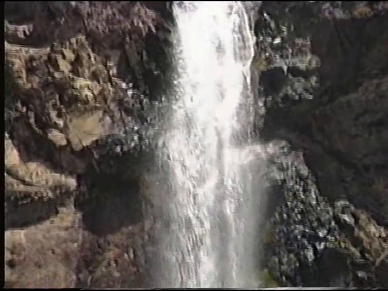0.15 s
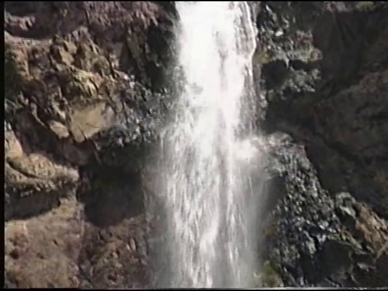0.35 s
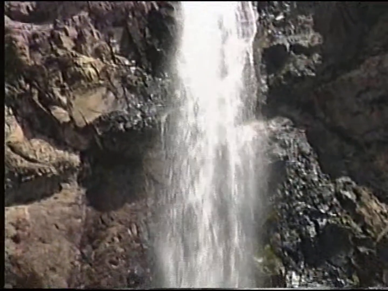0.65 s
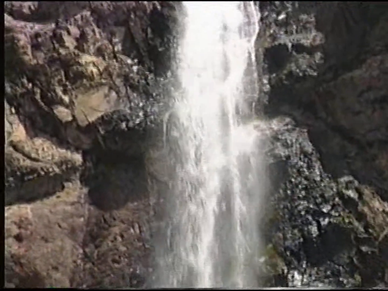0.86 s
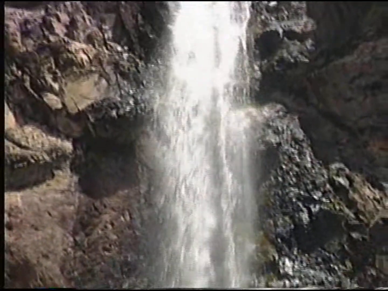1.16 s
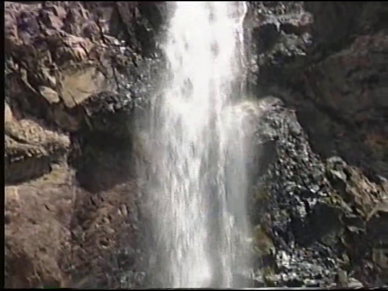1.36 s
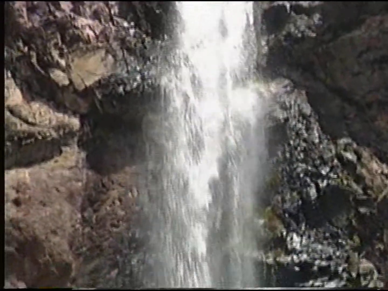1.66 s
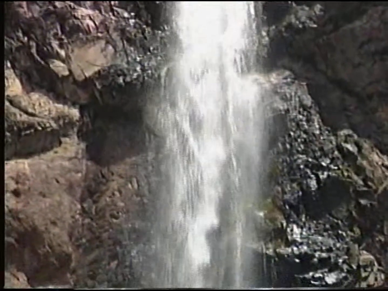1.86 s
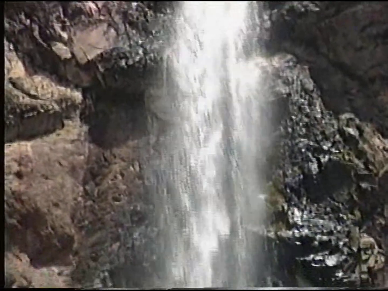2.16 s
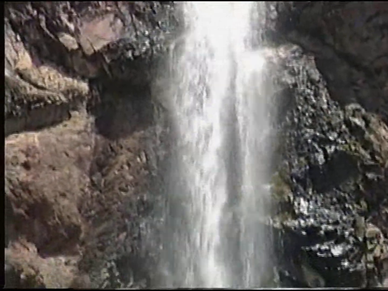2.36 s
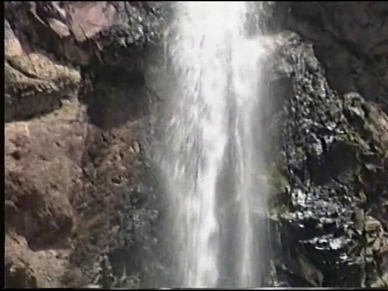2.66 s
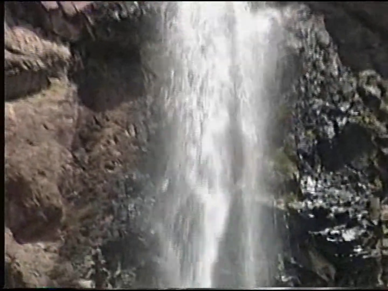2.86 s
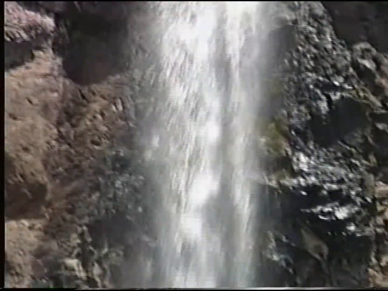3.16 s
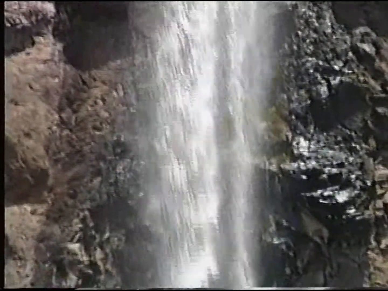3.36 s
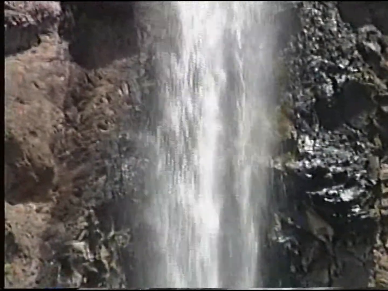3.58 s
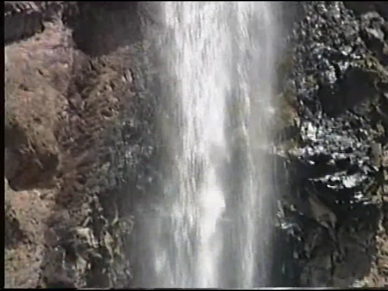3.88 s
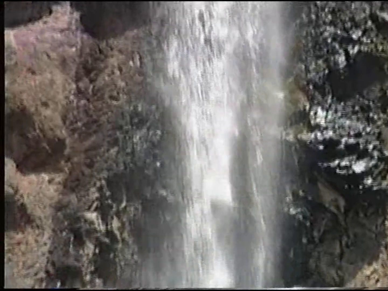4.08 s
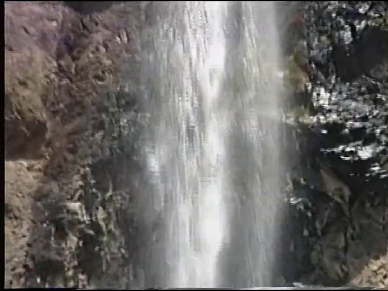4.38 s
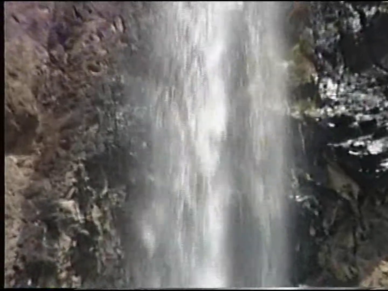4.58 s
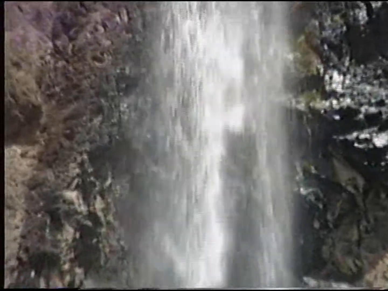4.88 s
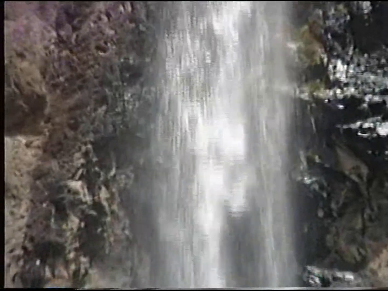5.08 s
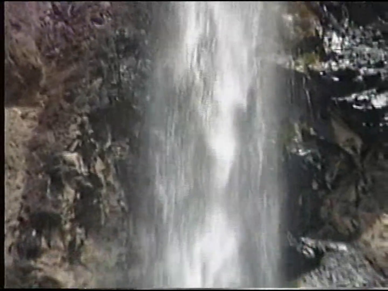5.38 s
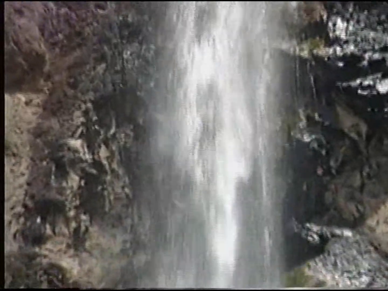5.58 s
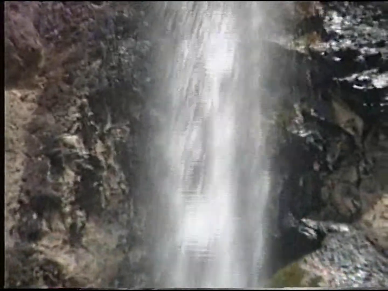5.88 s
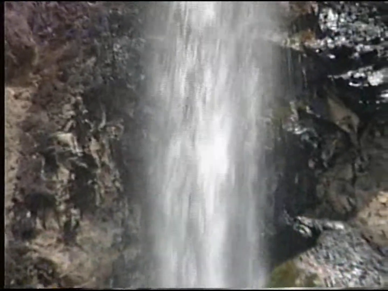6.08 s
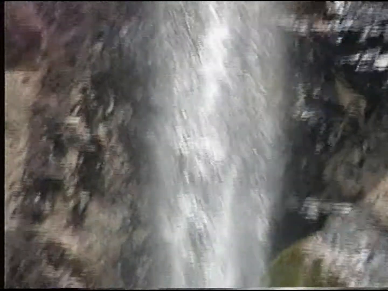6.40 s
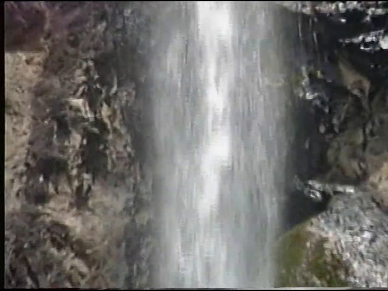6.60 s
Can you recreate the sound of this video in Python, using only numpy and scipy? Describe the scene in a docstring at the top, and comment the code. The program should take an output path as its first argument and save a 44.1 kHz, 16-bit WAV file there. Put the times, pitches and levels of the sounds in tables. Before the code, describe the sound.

A tall waterfall pours down a rock face outdoors, filling everything with an even, continuous roar and a bright hiss of bursting spray. No single splash stands out and the level barely changes from start to finish. An old tape camcorder hears it in mono, thin in the bass, hollow in the midrange, its treble roughened by a fine flutter, with a very faint hum and high whine.

```python
"""Tall waterfall on a tape camcorder

A tall waterfall roars against a rock face: plunging jets and bursting drops, so many that they merge
into a steady roar and a hiss of spray. Each is random noise, coloured and made faintly patchy.
The bass is thin, there is a hollow near 1.6 kHz, and the treble flutters as the tape shivers on its head.
The camera adds a faint hum and whine."""
import sys
import numpy as np
from scipy import signal
from scipy.fft import rfft, irfft, next_fast_len
from scipy.io import wavfile
from scipy.ndimage import uniform_filter1d, map_coordinates

SR = 44100
rng = np.random.default_rng(int(sys.argv[2]) if len(sys.argv) > 2 else 0)


def transcribe(signal):
    """Save signal, clipped to [-1, 1], as a 16-bit WAV file at the path in sys.argv[1]."""
    frames = np.atleast_2d(signal).T
    limited = np.clip(frames, -1, 1)
    pcm = np.round(limited * 32767).astype(np.int16)
    wavfile.write(sys.argv[1], SR, pcm)


N = 297234  # length in samples


def amp(db):
    """Turn a level in dB into a gain to multiply by."""
    return 10 ** (np.asarray(db) / 20)


def unit(x):
    """Scale x to an rms (average strength) of 1."""
    return x / np.sqrt(np.mean(x ** 2))


def wobble(rate):
    """Draw a smooth random curve through `rate` random points a second."""
    points = rng.standard_normal(int(N * rate / SR) + 4)
    return map_coordinates(points, [np.arange(N) * rate / SR])


def filtered(x, response):
    """Filter x: multiply each of its frequencies by response(frequency in Hz)."""
    m = next_fast_len(N + 8192)  # spare room so the end does not wrap onto the start
    spectrum = rfft(x, m) * response(np.fft.rfftfreq(m, 1 / SR))
    return irfft(spectrum, m)[:N]


def camera_tones():
    """Two steady sine tones: the hum of the head drum and the whine of the line scan."""
    # Each row: frequency in Hz, rms level in dB.
    tones = [(45, -54), (15741, -72)]
    t = np.arange(N) / SR
    return sum(amp(db) * np.sqrt(2) * np.sin(2 * np.pi * hz * t) for hz, db in tones)


def microphone(x):
    """A cavity in the microphone housing resonates and swallows one band of sound."""
    # One row: centre of the dip in Hz, width in Hz, gain at the centre in dB.
    hollow = (1597, 700, -10)
    centre_hz, width_hz, depth_db = hollow

    def dip(hz):
        detuning = centre_hz ** 2 - hz ** 2
        damping = 1j * hz * width_hz
        return (detuning + amp(depth_db) * damping) / (detuning + damping)

    return filtered(x, dip)


def tape(x):
    """The gap between tape and head varies; short wavelengths, the treble, feel it most."""
    # Tape vibration. Each row: frequency in Hz, depth at 10 kHz as a fraction, phase in radians.
    shiver = [(82.03, .085, -.45), (164.06, .025, -.6)]
    t = np.arange(N) / SR
    contact = sum(depth * np.cos(2 * np.pi * hz * t + phase) for hz, depth, phase in shiver)
    # uneven coating and tension
    contact = contact + 0.025 * wobble(35) + 0.04 * wobble(150) + 0.045 * wobble(500)
    treble = filtered(x, lambda hz: (hz / 10000) ** 1.3)
    x = x + contact * treble
    return x / (1 + np.abs(x / 1.1) ** 6) ** (1 / 6)  # soft ceiling at 1.1


def rush(spectrum, patchy_db):
    """Many overlapping splashes: noise of rms 1, coloured by a spectrum, with faint random patches."""
    z = signal.stft(rng.standard_normal(N + 512), nperseg=512)[2]
    # blur random values over frequency, then over time, into patches
    patches = uniform_filter1d(rng.standard_normal(z.shape), size=6, axis=0)
    patches = uniform_filter1d(patches, size=10, axis=1)
    patchy = z * amp(patchy_db * unit(patches))
    noise = signal.istft(patchy, nperseg=512)[1][:N]
    f, db = np.transpose(spectrum)

    def colour(hz):
        return amp(np.interp(np.log(hz + 1), np.log(f + 1), db))

    return unit(filtered(noise, colour))


def spray():
    """Drops bursting on the rock make a bright hiss whose level drifts slightly."""
    # Colour of the hiss. Each row: frequency in Hz, relative level per Hz in dB.
    spray_spectrum = [(300, -16.5), (1200, -7.5), (2200, 1), (3500, -0.5), (4500, -2), (5450, -3.5),
                      (6200, -3.2), (7000, -4), (8500, -7), (10000, -11.5), (12000, -20.5), (14000, -30.5),
                      (15400, -46), (15600, -70)]
    # Slow drift. Each row: time in seconds, level in dB (only its distance from the mean counts).
    breath = [(0.0, -22), (4.8, -21.5), (6.72, -22), (6.74, -22)]
    s, db = np.transpose(breath)
    drift_db = np.interp(np.arange(N) / SR, s, db)
    level_db = -21 + drift_db - drift_db.mean()
    return amp(level_db) * rush(spray_spectrum, patchy_db=0.4)


def roar():
    """Jets plunging into the pool overlap so densely that none stands out: a steady low roar."""
    # Colour of the roar. Each row: frequency in Hz, relative level per Hz in dB.
    roar_spectrum = [(5, -24), (30, -24), (60, -23.5), (95, -15), (130, -8), (190, -3), (300, 0), (430, -2),
                     (590, -4), (830, -4), (1050, -6), (1300, -7), (2000, -15), (3500, -29.5), (8000, -60)]
    level_db = -14.5  # rms
    return amp(level_db) * rush(roar_spectrum, patchy_db=0.3)


def scene():
    """The fall fills the whole scene: roar and spray together, in one channel."""
    return (roar() + spray())[None]


def record(dry):
    """Pass through microphone and tape, add the camera's tones, cut the top and add an offset."""
    top_hz = 15805  # nothing passes from here up
    offset = 0.1012  # constant offset of the converter
    sound = tape(microphone(dry[0])) + camera_tones()
    return (filtered(sound, lambda hz: hz < top_hz) + offset)[None]


dry = scene()
out = record(dry)
transcribe(out)
```